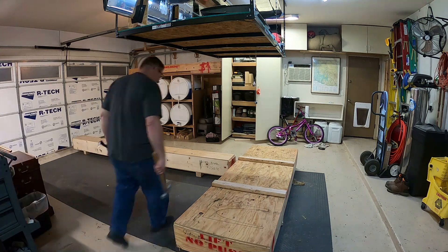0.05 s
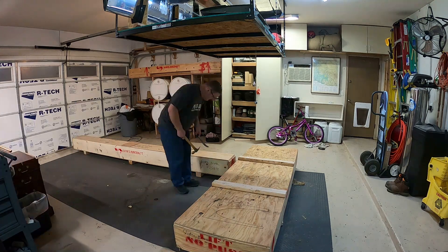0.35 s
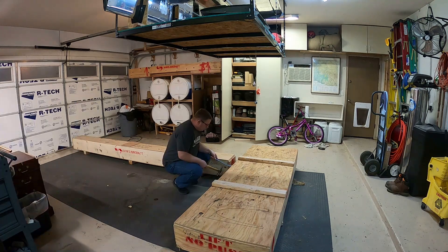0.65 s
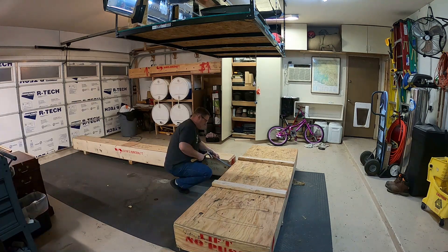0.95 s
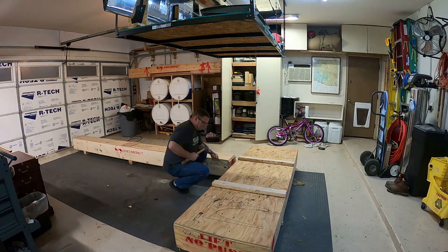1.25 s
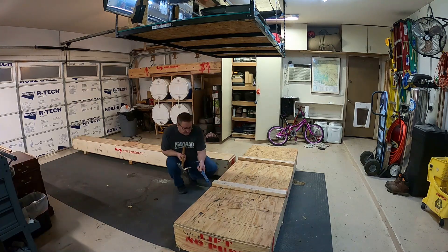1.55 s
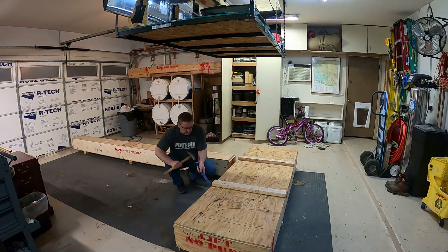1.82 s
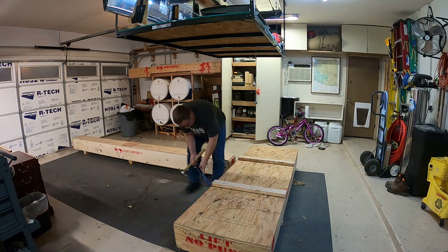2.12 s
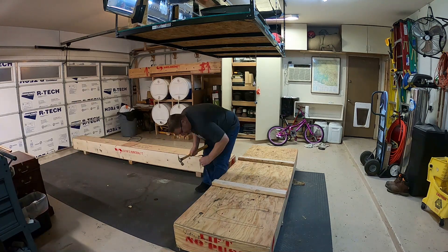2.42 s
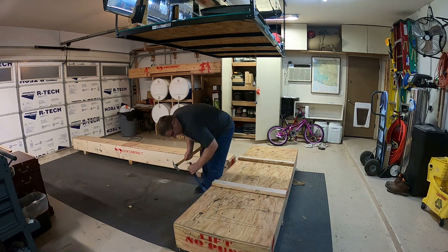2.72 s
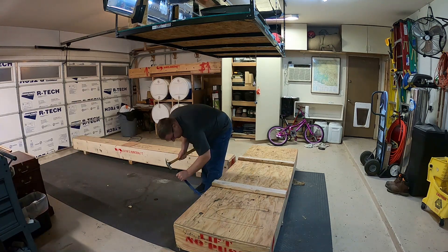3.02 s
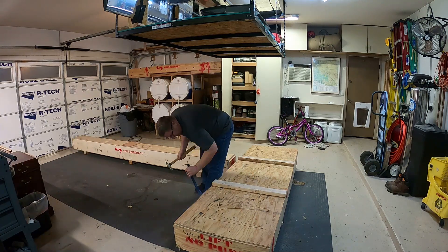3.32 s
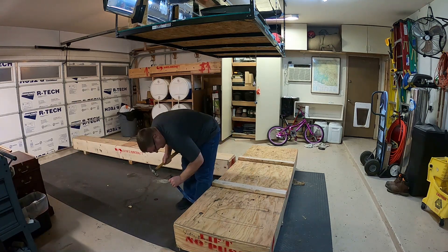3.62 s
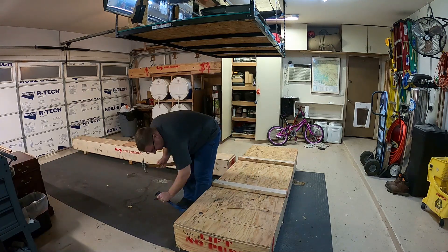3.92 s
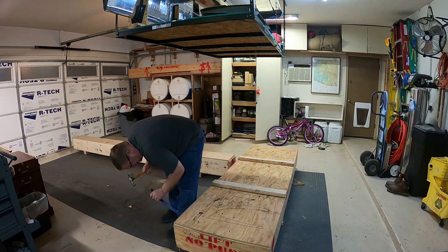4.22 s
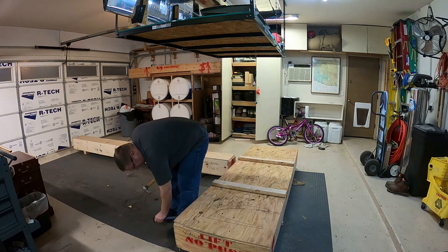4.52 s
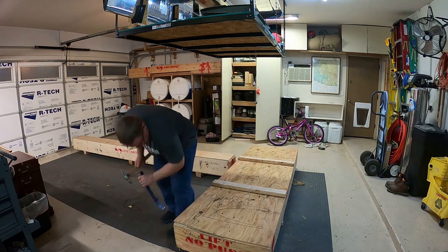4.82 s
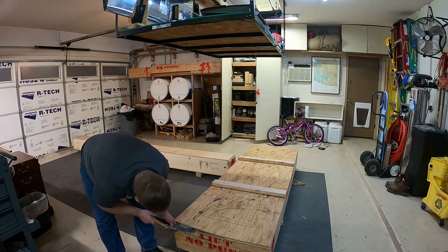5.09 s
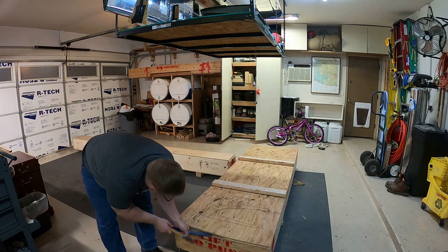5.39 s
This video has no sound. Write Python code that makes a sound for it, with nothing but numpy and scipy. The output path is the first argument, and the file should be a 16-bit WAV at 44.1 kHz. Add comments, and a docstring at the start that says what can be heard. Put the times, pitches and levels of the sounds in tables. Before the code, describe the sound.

Rapid, high-pitched bursts of hammering on a wooden crate, then scattered tool knocks over a faint garage hum.

```python
"""Work on a plywood crate in a garage, in time-lapse, so every sound is short and high.
At first the room hums faintly, clothes and shoes rustle by friction, and tools knock lightly.
From 1.1 to 3.8 s, six runs of hammer blows, some thirty a second, excite the modes of wood and nail.
Then tools and boards knock more densely, steel slides along an edge near 4.9 s, and the hardest
knock falls near 5.5 s. After each loud impact an automatic gain ducks the room."""
import sys
import numpy as np
from scipy import signal
from scipy.fft import rfft, irfft
from scipy.io import wavfile
from scipy.ndimage import uniform_filter1d, minimum_filter1d

SR = 44100
rng = np.random.default_rng(int(sys.argv[2]) if len(sys.argv) > 2 else 0)


def generate_wav(signal):
    """Clip the signal to [-1, 1] and save it as 16-bit WAV at the path in sys.argv[1]."""
    frames = np.transpose(np.atleast_2d(signal))
    scaled = np.clip(frames, -1, 1) * 32767
    pcm = np.round(scaled).astype(np.int16)
    wavfile.write(sys.argv[1], SR, pcm)


N = 244755
TIME = np.arange(N) / SR
SIZE = 8192  # samples in one impact
AGE, BINS = np.arange(SIZE) / SR, np.fft.rfftfreq(SIZE, 1 / SR)  # its time [s] and frequency [Hz] axes


def undb(db):
    """Amplitude ratio: a factor of ten for every 20 dB."""
    return 10 ** (np.asarray(db) / 20)


def tone(points, hz=BINS):
    """Spectral envelope: gain interpolated in decibels over log frequency."""
    at, db = np.transpose(points)
    return undb(np.interp(np.log(hz + 1), np.log(at), db))


def fade(t60):
    """Damping: exponential decay by 60 dB in t60 seconds."""
    return undb(-60 * AGE / t60)


def ringdown(t60, early_db, early_t60, tail_db, rise_s=0.00061, tail_t60=0.13):
    """Free decay: a struck board swells, sheds most energy at once, then dies away with the room."""
    decay = fade(t60) + undb(early_db) * fade(early_t60) + undb(tail_db) * fade(tail_t60)
    return (1 - np.exp(-AGE / rise_s)) * decay


def minimum_phase(gain):
    """Causality: the quickest-starting filter with this gain, from the folded cepstrum."""
    cepstrum = irfft(np.log(gain + 1e-9))
    cepstrum[..., 1:SIZE // 2] *= 2
    cepstrum[..., SIZE // 2 + 1:] = 0
    return np.exp(rfft(cepstrum))


def resonances(modes):
    """Resonance: Lorentzian peaks add in power on a flat base."""
    peaks = sum(undb(db) ** 2 / (1 + (2 * (BINS - hz) / width) ** 2) for hz, width, db in modes)
    return np.sqrt(1 + peaks)


def add(out, start_s, sound):
    """Superposition: a sound adds to the mix from its start time."""
    i = int(start_s * SR)
    out[:, i:i + SIZE] += sound[:, :max(N - i, 0)]


def crackle(rate, t60, spread_db):
    """Incoherent addition: an envelope summing the energy of tiny contacts, each smeared by the room."""
    step = int(SR / rate)
    starts = np.arange(0, N - step, step)
    sizes = undb(spread_db * rng.uniform(-1, 1, len(starts)))
    energy = np.zeros(N)
    energy[starts + rng.integers(0, step, len(starts))] = sizes ** 2
    return np.sqrt(abs(signal.fftconvolve(energy, fade(t60) ** 2)[:N]))


# stereo width: (frequency [Hz], side relative to mid [dB])
WIDTH = [(40, -16), (130, -6.5), (260, -13.5), (550, -15), (1200, -19), (2200, -16), (4200, -10.5),
         (8000, -6.5), (14000, -6)]
def wash(spectrum, envelope):
    """Spectral shaping: enveloped white noise is filtered into stereo noise of rms 1."""
    hz = np.fft.rfftfreq(N, 1 / SR)
    spectra = rfft(rng.standard_normal((2, N)) * envelope) * tone(spectrum, hz)
    mid, side = irfft(spectra[0], N), irfft(spectra[1] * tone(WIDTH, hz), N)
    both = np.array([mid + side, mid - side])
    return both / both.std()


def impact(grain, envelope, gain, db, lag_s=0.000916, lag_hz=3000, damp_s=0.089):
    """Dense modes ring as decaying noise; the rows of grain are mid, side and mode strength."""
    # hard garage surfaces keep the treble going a little longer
    splash = rfft(grain[:2] * (fade(0.12) - fade(0.03)))
    modes = rfft(grain[:2] * envelope) + undb(-6) * splash * BINS ** 2 / (BINS ** 2 + 6000 ** 2)
    # the modes are even in broad level, but the point of contact favours some high ones
    modes *= minimum_phase(uniform_filter1d(abs(modes) ** 2, 36) ** -.5)
    favoured = uniform_filter1d(grain[2, :len(BINS)], 30) * np.sqrt(30)
    favoured = uniform_filter1d(favoured - uniform_filter1d(favoured, 300), 15)
    modes *= minimum_phase(undb(5 * favoured * BINS / (BINS + 1800)))
    # dispersion: low bending waves travel more slowly, so the bright tick comes before the body
    modes *= np.exp(-2j * np.pi * lag_s * lag_hz * np.arctan(BINS / lag_hz))
    modes[0] += undb(-6) * BINS / (BINS - 5000j)  # tick of contact
    mid, side = irfft(modes * minimum_phase(np.array([gain, gain * tone(WIDTH)])))
    late_fade = 1 / (1 + (AGE / damp_s) ** 4)
    rms = np.sqrt(np.sum(mid ** 2) / (SR / 40))  # as if all the energy fell within 25 ms
    return np.array([mid + side, mid - side]) * late_fade * undb(db) / rms


# spectrum of the room: (frequency [Hz], level [dB])
HUM_TONE = [(40, -34), (120, -17.5), (220, -6), (340, -10), (700, -1.5), (1060, -4.5), (1450, 5.5),
            (1900, 11), (2200, 4.5), (2650, -2.5), (3900, -1.5), (5500, -14), (16000, -92.5)]
def hum(db=-56, waver_db=1.5, waver_hz=25):
    """Amplitude modulation: the garage drone, raised to a soft band of noise, wavers at random."""
    step = int(SR / waver_hz)
    drift = uniform_filter1d(np.repeat(rng.standard_normal(N // step + 1), step), step)[:N]
    return wash(HUM_TONE, undb(waver_db * drift)) * undb(db)


# movements of the body: (time [s], duration [s], level [dB])
MOVES = [(0.065, 0.16, -46.5), (0.3, 0.37, -52.5), (0.74, 0.2, -59.5), (1.388, 0.11, -47.5),
         (1.543, 0.15, -53.5), (2.17, 0.17, -55), (2.498, 0.2, -55), (2.937, 0.099, -48),
         (3.52, 0.16, -59.5), (4.04, 0.44, -58.5), (4.614, 0.12, -51.5), (5.16, 0.2, -59)]
def motion(attack_s=0.014, release_t60=0.37, still_db=-61):
    """Amplitude envelope: each movement swells, holds and decays; the body is never quite still."""
    gain = undb(still_db)
    for start, length, db in MOVES:
        attack = np.clip((TIME - start) / attack_s, 0, 1)
        release = undb(-60 * np.maximum(TIME - start - length, 0) / release_t60)
        gain = np.maximum(gain, undb(db) * attack * release)
    return gain


# spectrum of rough contact: (frequency [Hz], level [dB])
GRIT_TONE = [(200, -28), (700, 7), (4000, -12), (8000, 8.5), (16000, 5)]
def grit(rate, t60, spread_db):
    """Surface roughness: many tiny collisions merge into a gritty noise."""
    return wash(GRIT_TONE, crackle(rate, t60, spread_db))


# spectrum of rubbing cloth and soles: (frequency [Hz], level [dB])
RUSTLE_TONE = [(100, -36.5), (500, -26), (1500, -17), (4000, -10), (7000, -14.5), (10500, -3.5),
               (14000, -5.5), (16000, -12)]
# short scuffs, and a brief squeak at 1.276 s: (time [s], level [dB])
SCUFFS = [(0.081, -46.5), (0.2643, -41.5), (0.307, -42), (0.3933, -43), (0.571, -43.5), (0.6, -47),
          (0.6848, -39.5), (0.97, -49), (1.276, -37), (1.647, -47), (1.684, -42), (2.119, -48),
          (2.1695, -38), (4.135, -46), (4.1672, -42), (4.266, -47.5), (4.39, -50.5)]
def rustle(grit_db=-8, scuff_t60=0.05):
    """Friction: cloth crinkles with each move, grit ticks underfoot, and soles scuff."""
    cloth = wash(RUSTLE_TONE, crackle(rate=80, t60=.05, spread_db=8))
    underfoot = undb(grit_db) * grit(rate=40, t60=.045, spread_db=7)
    out = (cloth + underfoot) * motion()
    for start, db in SCUFFS:
        add(out, start, impact(rng.standard_normal((3, SIZE)), fade(scuff_t60), tone(RUSTLE_TONE), db))
    return out


# envelope of a sliding tool: (time [s], level [dB])
SLIDE = [(4.88, -80), (4.91, -44.5), (5.0, -58.5), (5.05, -80)]
def slide():
    """Sliding friction: steel drags over the rough edge of the plywood."""
    return grit(rate=110, t60=.06, spread_db=6) * undb(np.interp(TIME, *np.transpose(SLIDE)))


# centres of thud, body, neutral middle, bite and sizzle: (frequency [Hz])
COLOUR_HZ = [600, 1200, 1950, 4000, 10000]
def tint(wood_db, hard_db):
    """Contact stiffness: a harder touch gives bite and sizzle; more wood gives thud and body."""
    return tone(list(zip(COLOUR_HZ, [wood_db, .72 * wood_db, 0, .6 * hard_db, hard_db])))


# broad spectrum of a knock: (frequency [Hz], level [dB])
KNOCK_TONE = [(40, -40.5), (150, -33.5), (330, -28.5), (500, -11.5), (690, -7), (860, -6.5), (1080, -4.5),
              (1300, -0.5), (1950, 1.5), (2600, -3), (3500, -2), (6000, -10), (10000, -13.5), (16000, -17)]
# modes that all knocks share: (frequency [Hz], bandwidth [Hz], level over the broad spectrum [dB])
PANEL_MODES = [(687, 66, 6), (1300, 120, 2.5)]
def knock(db, wood_db, hard_db, ring_hz, ring_width_hz=95, ring_db=9):
    """Impulse response: each spot of wood or steel adds its own resonance to those of the panel."""
    rings = resonances([(ring_hz, ring_width_hz, ring_db), *PANEL_MODES])
    t60 = 0.094 * 2 ** (db / 51.5)  # louder knocks ring longer
    envelope = ringdown(t60, early_db=0, early_t60=0.012, tail_db=-46)
    gain = tone(KNOCK_TONE) * tint(wood_db, hard_db) * rings
    return impact(rng.standard_normal((3, SIZE)), envelope, gain, db)


# tools and boards colliding: (time [s], level [dB], wood [dB], hardness [dB], resonance [Hz])
KNOCKS = [(0.4208, -42, 7, 9.5, 1120), (0.5109, -44.5, 3, -8, 1760), (0.731, -47, 8.5, -4, 1850),
          (0.9484, -35, -3.5, -14, 2150), (1.287, -35.5, -6, -6, 2170), (1.5002, -37, 5, 6.5, 3360),
          (1.9903, -21, -3, 9.5, 3480), (2.201, -38, 1.5, -5, 2000), (2.4309, -11.5, -7, 6, 3780),
          (2.5714, -33, -4.5, -7.5, 1950), (2.892, -17.5, -5, 5.5, 2020), (3.0287, -19.5, -18, -24, 1870),
          (3.076, -32.5, -5, -14, 1940), (3.4193, -9.5, -8.5, -3, 1310), (3.6114, -30.5, -19, -30.5, 1750),
          (3.641, -41, 2, -17, 1790), (3.8243, -35.5, 10.5, 1, 680), (3.8885, -37, 8, -3.5, 1680),
          (3.979, -12, 4, 9, 1860), (4.0188, -23, 14, -13, 1366), (4.0873, -27, -2.5, -6, 1760),
          (4.1111, -39.5, 6, 1, 1450), (4.1842, -35.5, 12, -5, 1550), (4.2304, -29.5, -6, -14, 1470),
          (4.3378, -38, 11, -16, 1460), (4.366, -44, -0.5, -20, 1720), (4.4899, -21, 6, 8, 1320),
          (4.5558, -8.5, 1, -1.5, 1605), (4.6708, -34, 11.5, 8.5, 1244), (4.7669, -7, 5.5, -0.5, 1260),
          (4.774, -6.5, 8, 1, 1280), (5.0586, -32, -12.5, -16.5, 2350), (5.151, -27.5, 7.5, -7, 1310),
          (5.1864, -33, 0, -8.5, 1210), (5.2104, -39.5, 10, 1, 696), (5.2327, -29, -1, 3, 3940),
          (5.289, -35, 6, 8, 3100), (5.308, -5, -1, -3, 1336), (5.382, -31, 3, -3.5, 710),
          (5.4133, -28.5, -4, -5, 3080), (5.435, -24.5, 4, -3, 2120), (5.4737, -0.5, 2, -1, 1987),
          (5.5227, -21, 18, -16, 1290)]
def knocks(tap_count=16):
    """Impact excitation: tools and boards knock, and tools shifting in the hands tap at random."""
    out = np.zeros((2, N))
    for start, *contact in KNOCKS:
        add(out, start, knock(*contact))
    for k, (when, strength, spot) in enumerate(rng.uniform(-1, 1, (tap_count, 3))):
        start = (k + (1 + when) / 2) * N / SR / tap_count
        add(out, start, knock(db=-50 + strength, wood_db=3, hard_db=1.5, ring_hz=1700 * 2 ** (spot / 2)))
    return out


# broad spectrum of a blow: (frequency [Hz], level [dB])
HAMMER_TONE = [(40, -41), (150, -27.5), (300, -29), (480, -15.5), (620, -16.5), (780, -16.5), (1000, -7),
               (1600, 3), (2000, 0), (2450, -1), (3800, 0.5), (6500, -5.5), (10000, -9.5), (16000, -13.5)]
# modes of the crate: (frequency [Hz], bandwidth [Hz], level over the broad spectrum [dB])
CRATE_MODES = [(544, 33, 8.5), (659, 133, 17), (935, 180, 4.5), (1840, 70, -14), (2007, 166, 9),
               (3010, 140, -0.5), (3560, 15, 6.5), (5000, 55, 6)]
# first blow of each run:
# (time [s], level [dB], wood [dB], base hardness [dB], wood resonance [Hz], steel resonance [dB])
RUNS = [(1.0836, -9, 0, -6, 2050, 3), (1.7364, -10.5, 5, -4, 1920, 7.5), (2.2976, -9, 9.5, 6.5, 1920, 8),
        (2.664, -7, 2.5, 2, 1920, 12.5), (3.1515, -7, 4, 0.5, 1790, 10.5), (3.7085, -7.5, 3, 4.5, 1840, 9)]
# later blows, one row per run: (time [s], ...)
LATER_BLOWS = [
    [1.1227, 1.153, 1.1795],
    [1.7734, 1.8037, 1.8298, 1.8544, 1.8794, 1.904, 1.9278],
    [2.3364, 2.3719],
    [2.6958, 2.723],
    [3.185, 3.2148, 3.2426, 3.2731, 3.3009],
    [3.7405, 3.7776],
]
def hammer(likeness=.75, easing_db=1.77, seating_db=1.5, steel_hz=3860, width_hz=110, wood_ring_db=9.5):
    """Modal excitation: the blows of a run land on one spot, so nail and board ring much alike."""
    wall_echo = undb(-6) * np.interp(AGE - .0078, AGE, fade(0.04), left=0)
    envelope = ringdown(t60=0.08, early_db=8, early_t60=0.022, tail_db=-44) + wall_echo
    out = np.zeros((2, N))
    for (first, db, wood_db, hard_db, wood_hz, steel_db), later in zip(RUNS, LATER_BLOWS):
        grain = rng.standard_normal((3, SIZE))
        for k, start in enumerate([first, *later]):
            seated = np.log2(1 + k)  # as the nail seats, the blows weaken and the contact hardens
            aim, glance, touch = rng.uniform(-1.1, 1, 3)  # no two blows land quite alike
            grain = np.sqrt(likeness) * grain + np.sqrt(1 - likeness) * rng.standard_normal((3, SIZE))
            wood_mode = (wood_hz * (1 + .025 * aim), width_hz, wood_ring_db)
            steel_mode = (steel_hz, width_hz, steel_db + 4 * glance)
            rings = resonances([*CRATE_MODES, wood_mode, steel_mode])
            contact_db = hard_db - 2 + seating_db * seated + 1.5 * touch
            gain = tone(HAMMER_TONE) * tint(wood_db, contact_db) * rings
            add(out, start, impact(grain, envelope, gain, db - easing_db * seated))
    return out


def scene(left_db=1.2):
    """Superposition of all sources; a level difference between channels sets them a little left."""
    balance = undb(np.array([[left_db], [-left_db]]) / 2)
    return (hammer() + knocks() + rustle() + slide() + hum()) * balance


def auto_gain(x, threshold_db=-28, ratio=2, hold_s=0.049, recovery_db_per_s=78.5):
    """Compression: the gain drops at each loud blow, holds, then climbs back, so the room ducks."""
    power = uniform_filter1d(np.mean(x ** 2, axis=0), SR // 40)
    level_db = 10 * np.log10(abs(power) + 1e-12)
    cut_db = np.minimum(threshold_db - level_db, 0) * (1 - 1 / ratio)
    hold = int(hold_s * SR)
    held_db = minimum_filter1d(cut_db, hold, origin=(hold - 1) // 2)
    climb_db = recovery_db_per_s * TIME
    return undb(np.minimum.accumulate(held_db - climb_db) + climb_db)


def record(dry, top_hz=16100):
    """Compression ducks loud blows, saturation rounds the peaks, and a low-pass cuts the top."""
    lowpass = signal.ellip(10, .2, 70, top_hz, fs=SR, output="sos")
    return signal.sosfilt(lowpass, np.tanh(dry * auto_gain(dry)))


dry = scene()
out = record(dry)
generate_wav(out)
```